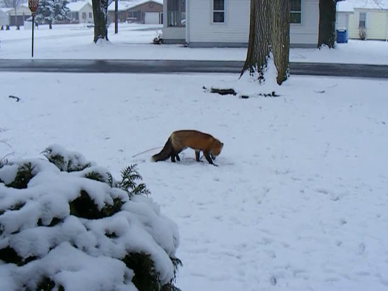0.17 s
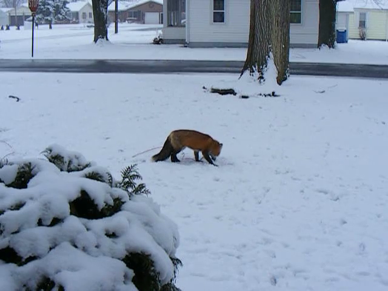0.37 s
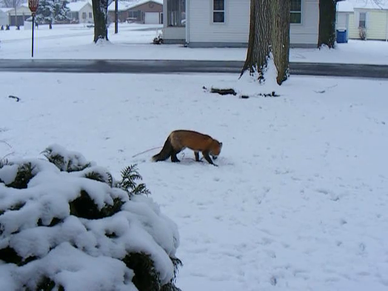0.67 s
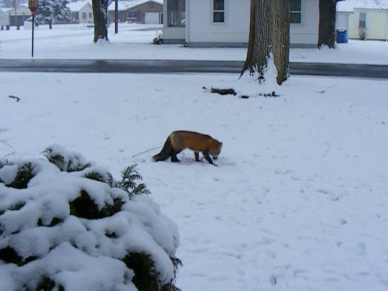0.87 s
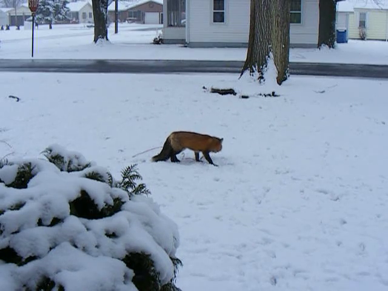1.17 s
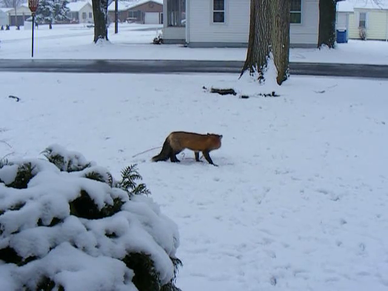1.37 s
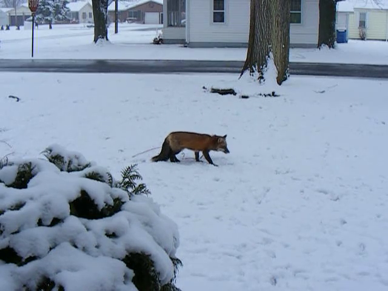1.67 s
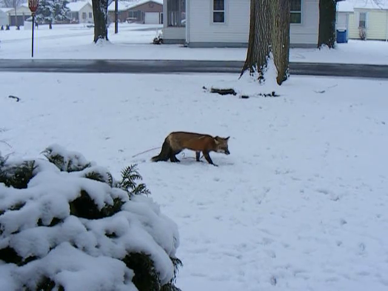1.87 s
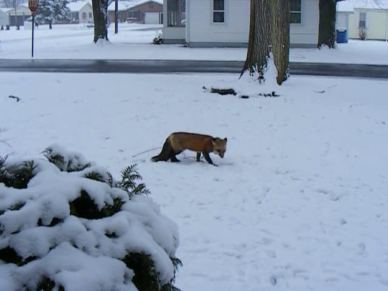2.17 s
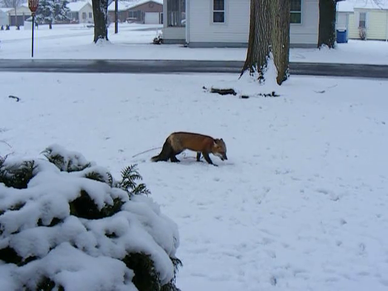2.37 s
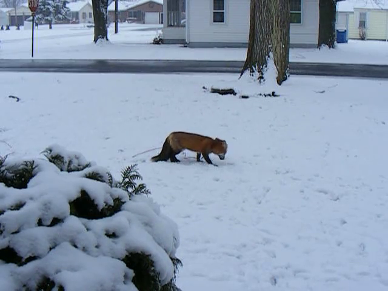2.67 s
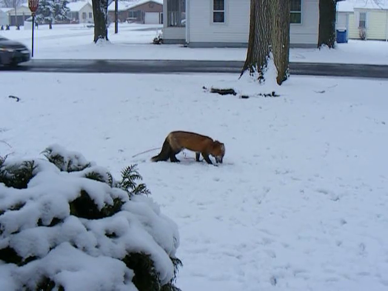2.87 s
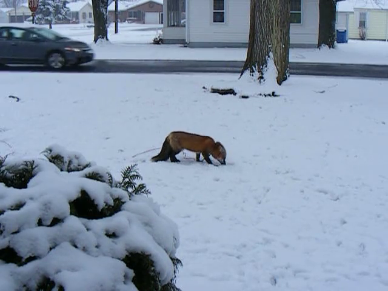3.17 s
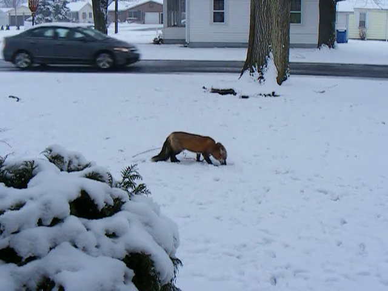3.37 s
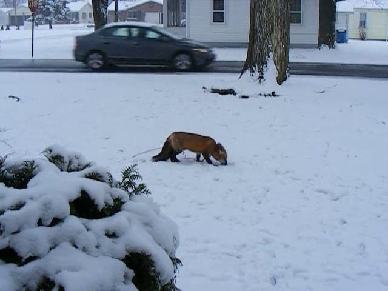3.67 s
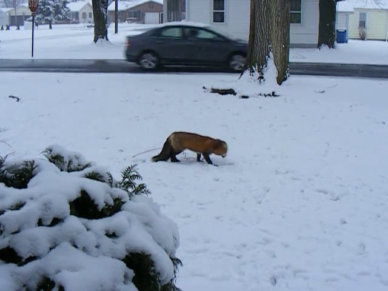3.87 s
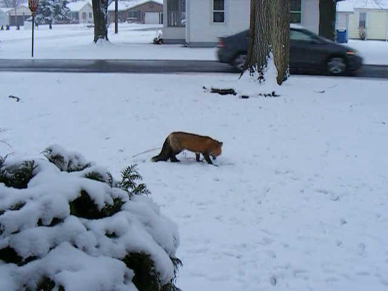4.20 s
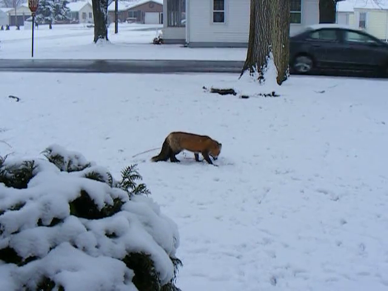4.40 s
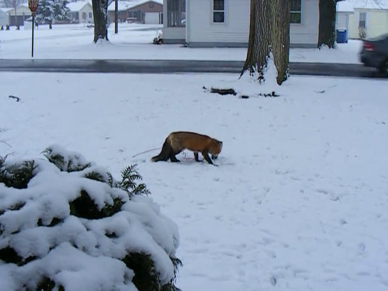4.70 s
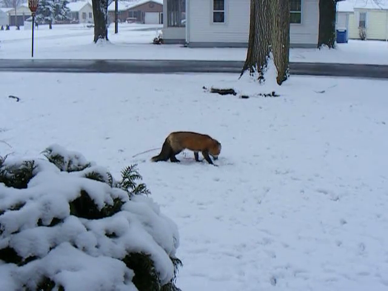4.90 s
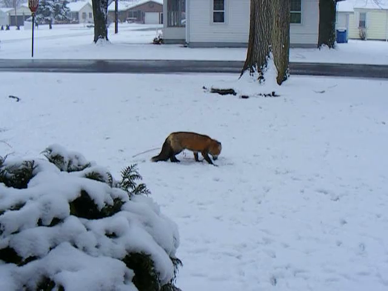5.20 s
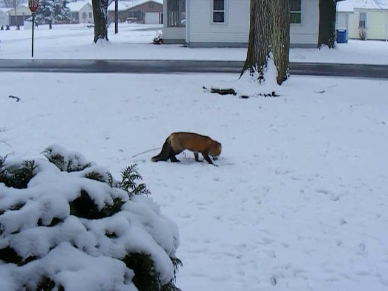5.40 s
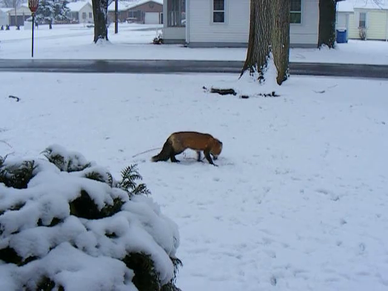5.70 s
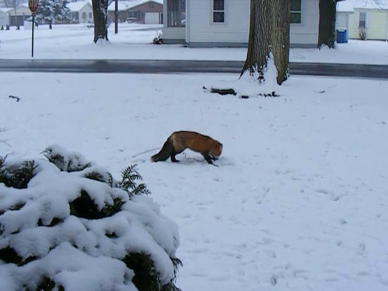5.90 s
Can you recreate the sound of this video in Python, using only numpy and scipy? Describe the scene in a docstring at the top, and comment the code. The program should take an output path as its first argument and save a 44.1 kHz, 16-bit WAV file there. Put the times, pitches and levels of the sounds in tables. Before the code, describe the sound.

Low engine hum and lumpy slush crackling early on, settling into wet-road tyre hiss, a burst of spray and a growing low road roar.

```python
"""A car pulls away through slush, changes gear and rolls past on a wet street, heard across a snowy garden.
First the engine hums over a lower idling hum; then slush crunches as clicks and noise bursts in resonances.
The engine pitch climbs, then falls at the gear change. Noise and droplets in resonances make the tar hiss.
Spray splashes up as the car comes nearer, the tread roar grows, and low gusts come near the end."""
import sys
import numpy as np
from scipy import signal
from scipy.fft import rfft, irfft, next_fast_len
from scipy.io import wavfile

SR = 44100
rng = np.random.default_rng(int(sys.argv[2]) if len(sys.argv) > 2 else 0)


def convert_level_to_amplitude(level_db):
    """Map a level in decibels to its linear amplitude factor."""
    exponent = np.asarray(level_db, float) / 20
    return 10 ** exponent


def digitize_waveform(pressure):
    """Quantize a signal to 16-bit integers and store it at the path in sys.argv[1].

    Rows of a 2-D input are taken as channels; values are limited to [-1, 1].
    """
    field = np.atleast_2d(pressure).T
    bounded = np.clip(field, -1, 1)
    quanta = np.round(bounded * 32767).astype(np.int16)
    wavfile.write(sys.argv[1], SR, quanta)


N = 266760

# Tyres crushing slush. Each row: time in seconds, level in dB before the high-pass.
SLUSH_LEVELS = [(0.362, -34), (0.43, -28.5), (0.57, -31.5), (0.75, -28.5), (0.87, -27.5), (0.91, -30),
                (0.95, -22), (1.3, -18.5), (1.38, -23.5), (1.44, -19.5), (1.5, -22.5), (1.61, -18.5),
                (1.77, -23), (1.92, -22), (1.95, -18.5), (2.0, -23.5), (2.35, -34)]


def rms_one(x):
    """Scales to rms 1."""
    return x / np.sqrt(np.mean(x ** 2) + 1e-20)


def in_time(rows):
    """Columns of a table against time, straight lines between rows."""
    s, *columns = np.transpose(rows)
    t = np.arange(N) / SR
    return [np.interp(t, s, column) for column in columns]


def while_heard(rows, fade_s):
    """Gain 1 between the first and last row, fading linearly outside."""
    t = np.arange(N) / SR
    inside_s = np.minimum(t - rows[0][0], rows[-1][0] - t)
    return np.clip(1 + inside_s / fade_s, 0, 1)


def swells(rows):
    """Sum of bell-shaped gains; rows: top in seconds, half-width in seconds at 1/e, level in dB."""
    t = np.arange(N) / SR
    return sum(convert_level_to_amplitude(db) * np.exp(-((t - top_s) / half_s) ** 2) for top_s, half_s, db in rows)


def drift(rate_hz):
    """Slow chance with spread 1: noise at every 40th sample through a double one-pole low-pass."""
    r = np.exp(-2 * np.pi * rate_hz * 40 / SR)
    noise = rng.standard_normal(N // 40 + 2002)
    slow = signal.lfilter([1], [1, -2 * r, r * r], noise)[2000:]   # drop the settling
    return np.interp(np.arange(N) / 40, np.arange(len(slow)), rms_one(slow))


def resonance(x, hz, width_hz):
    """Two-pole band-pass, gain 1 on top."""
    r = np.exp(-np.pi * width_hz / SR)
    zeros = np.array([1, 0, -1]) * (1 - r * r) / 2
    poles = [1, -2 * r * np.cos(2 * np.pi * hz / SR), r * r]
    return signal.lfilter(zeros, poles, x)


def rushing(modes, grains_per_s, grain_db, shared_db, own_db, flicker_hz):
    """Noise plus uneven droplets in resonances flickering together and alone; rms 1 at the microphone."""
    sizes = convert_level_to_amplitude(grain_db * np.minimum(rng.exponential(1, N), 4)) * rng.choice([-1, 1], N)
    grains = rms_one(sizes * (rng.random(N) < grains_per_s / SR))
    together, out = drift(flicker_hz), 0
    for hz, width_hz, level_db in modes:
        source = 0.75 * grains + 0.64 * rng.standard_normal(N)
        pass_hz = 1.91 * width_hz
        rung = resonance(resonance(source, hz, pass_hz), hz, pass_hz)   # twice: steep skirts
        flicker_db = shared_db * together + own_db * drift(flicker_hz)
        out = out + convert_level_to_amplitude(level_db + flicker_db) * rung
    return out / np.std(microphone(out))


def hum(hz, levels_db, waver_db):
    """Sines on the multiples of a moving pitch, each wavering in strength; rms levels."""
    phase = 2 * np.pi * np.cumsum(hz) / SR
    out = 0
    for multiple, db in enumerate(levels_db, 1):
        level = np.sqrt(2) * convert_level_to_amplitude(db + waver_db * drift(9))
        out = out + level * np.sin(multiple * phase + rng.uniform(0, 2 * np.pi))
    return out


def small_lumps():
    """Lesser lumps burst at random through the slush, their peaks following its level."""
    count, above_slush_db, spread_db = 24, 13.0, 3.0
    low_hz, high_hz, snap = 1300, 2400, 0.5
    when, size, pitch = rng.random((count, 3)).T
    slush_s, slush_db = np.transpose(SLUSH_LEVELS)
    s = slush_s[0] + when * (slush_s[-1] - slush_s[0])
    peak_db = np.interp(s, slush_s, slush_db) + above_slush_db + spread_db * (2 * size - 1)
    hz = low_hz * (high_hz / low_hz) ** pitch
    return list(zip(s, peak_db, hz, [snap] * count))


def crunches():
    """Each lump is a click in a few milliseconds of dying noise, ringing around its own pitch."""
    # Loudest lumps. Each row: start in seconds, peak in dB before the high-pass, pitch in Hz, snap share 0-1.
    big_lumps = [(0.4333, -6, 2070, 0.55), (0.4617, -6, 2150, 0.4), (0.5, -8.5, 2110, 0.4),
                 (0.5934, -8, 1130, 0.7), (0.6538, -5, 2300, 0.7), (0.6876, -6, 2190, 0.6),
                 (0.7305, -6, 2130, 0.6), (0.8728, -1, 1500, 0.75), (0.9351, -7, 2330, 0.4),
                 (0.9506, -2, 2260, 0.3), (1.006, -5, 2140, 0.6), (1.0987, -3, 2310, .55),
                 (1.1357, 2, 1290, 0.8), (1.1626, 3, 2340, 0.65), (1.2564, 1, 1360, .7),
                 (1.267, 2, 2000, .7), (1.3063, 4.5, 2240, 0.8), (1.4006, 2, 2160, 0.35),
                 (1.445, -3, 1400, 0.4), (1.5407, 4, 1690, 0.8), (1.6015, -2, 2400, 0.2),
                 (1.6485, -3, 2150, 0.6), (1.6749, 2, 1590, 0.75), (1.6934, -3, 2290, 0.6),
                 (1.7513, 1, 2170, .8), (1.7767, -3, 1590, .75), (1.9304, -4, 1530, 0.3),
                 (1.9583, 2, 2200, 0.75), (2.089, -6, 1590, 0.55), (2.2287, -7, 1670, 0.7)]
    lumps = big_lumps + small_lumps()
    length = 1500
    t, out = np.arange(length) / SR, np.zeros(N + length)
    noises = rng.standard_normal((len(lumps), length))
    for (s, peak_db, hz, snap), noise in zip(lumps, noises):
        force = (1 - snap) * noise * np.exp(-t / 0.005)
        force[20] -= 6 * snap   # the click
        burst = resonance(force, hz, 1300) + 0.18 * resonance(force, 3500, 2000)
        out[round(s * SR):][:length] += convert_level_to_amplitude(peak_db) * burst / np.abs(burst).max()
    return out[:N]


def slush():
    """Coarse, lumpy crushing noise plus the bursting lumps, without bass."""
    # Slush resonances. Each row: centre in Hz, nominal width in Hz, level in dB.
    slush_modes = [(1096, 140, -14), (1308, 290, 1), (1800, 360, -1), (2147, 224, 3), (2876, 920, -5.5),
                   (3550, 610, -2)]
    crushing = rushing(slush_modes, 1200, 4.5, shared_db=0.9, own_db=1.3, flicker_hz=70)
    crushing *= convert_level_to_amplitude(in_time(SLUSH_LEVELS)[0]) * while_heard(SLUSH_LEVELS, 0.012)
    no_bass = signal.butter(4, 850, "high", fs=SR, output="sos")   # small lumps make no bass
    return signal.sosfilt(no_bass, crushing + crunches())


def wet_tar():
    """Hiss of wet tar, duller from afar; a subtracted resonance stands for the ground echo's dip."""
    # Tar hiss. Each row: time in seconds, level in dB before tilt and dip, treble in dB against the rest,
    # share cancelled by the ground echo 0-1.
    hiss_levels = [(0.0, -28, -10, 0.1), (0.4, -28, -5.5, 0), (0.6, -26.5, -2.5, 0.05),
                   (0.86, -26.5, -13, 0.05), (1.08, -27.5, -5.5, .05), (2.2, -26.5, 3, 0.9),
                   (2.5, -25.5, 1.5, 0.7), (2.95, -26.5, 1, 0.6), (3.7, -25, -0.5, 0.1),
                   (4.28, -30.5, 1, 0.05), (4.89, -26.5, -1, 0.1), (5.05, -30.5, -1, 0.3),
                   (5.7, -26.5, -2, .1), (6.05, -27, -0.5, 0.2)]
    # Hiss resonances. Each row: centre in Hz, nominal width in Hz, level in dB.
    hiss_modes = [(1270, 370, -1.5), (1972, 423, 0.5), (2567, 910, -1.5), (3376, 510, -6)]
    treble_from_hz, dip_hz, dip_width_hz = 1600, 2020, 500
    level_db, treble_db, cancelled = in_time(hiss_levels)
    hiss = rushing(hiss_modes, 5000, 3.7, shared_db=0.5, own_db=0.96, flicker_hz=15)
    low = signal.sosfilt(signal.butter(1, treble_from_hz, fs=SR, output="sos"), hiss)
    hiss = low + convert_level_to_amplitude(treble_db) * (hiss - low)
    hiss = hiss - cancelled * resonance(hiss, dip_hz, dip_width_hz)
    return convert_level_to_amplitude(level_db) * hiss


def tread_roar():
    """Tread roar: almost smooth noise in a narrow group of resonances."""
    # Tread roar. Each row: time in seconds, level in dB.
    roar_levels = [(0.0, -40), (0.86, -36.5), (1.28, -33), (2.33, -36.5), (3.15, -34.5), (3.99, -36),
                   (4.28, -29.5), (4.6, -27), (4.9, -28.5), (5.37, -25), (5.76, -26.5), (5.9, -29.5),
                   (6.05, -29.5)]
    # Tread resonances. Each row: centre in Hz, nominal width in Hz, level in dB.
    roar_modes = [(826, 174, 2.5), (924, 118, 6.5), (1040, 220, -2)]
    roar = rushing(roar_modes, 2500, 2.7, shared_db=1.4, own_db=0.5, flicker_hz=8.3)
    return convert_level_to_amplitude(in_time(roar_levels)[0]) * roar


def groove_whistle():
    """Air pumped in the tread grooves: noise in one resonance."""
    # Groove whistle. Each row: time in seconds, level in dB.
    groove_levels = [(0.0, -42), (0.6, -34.5), (1.08, -32.5), (1.84, -28.5), (2.33, -34.5), (2.7, -31),
                     (3.15, -31.5), (3.8, -31), (4.5, -36), (4.89, -35), (5.37, -28.5), (5.7, -32),
                     (5.9, -42), (6.05, -44)]
    # Groove resonance. Each row: centre in Hz, nominal width in Hz, level in dB.
    groove_modes = [(1511, 213, 0)]
    whistle = rushing(groove_modes, 3000, 2.3, shared_db=-0.5, own_db=1.5, flicker_hz=11)
    return convert_level_to_amplitude(in_time(groove_levels)[0]) * whistle


def early_groove():
    """The groove whistle's lower pitch at the start: noise in one resonance."""
    # Early whistle. Each row: time in seconds, level in dB.
    early_levels = [(0.0, -37), (0.4, -35), (0.8, -38)]
    # Its resonance. Each row: centre in Hz, nominal width in Hz, level in dB.
    early_modes = [(1244, 200, 0)]
    whistle = rushing(early_modes, 3000, 2.0, shared_db=1.5, own_db=1.0, flicker_hz=10)
    return convert_level_to_amplitude(in_time(early_levels)[0]) * while_heard(early_levels, 0.2) * whistle


def spray():
    """Water thrown up in a second splash: fine droplets in resonances."""
    # Spray. Each row: time in seconds, level in dB.
    spray_levels = [(4.15, -33.5), (4.39, -21), (4.56, -24.5), (4.66, -20.5), (4.82, -26), (5.04, -26.5),
                    (5.08, -33.5), (5.17, -31), (5.25, -30), (5.36, -27), (5.45, -33)]
    # Spray resonances. Each row: centre in Hz, nominal width in Hz, level in dB.
    spray_modes = [(1980, 490, 3), (2470, 400, -1), (3050, 500, -2.5)]
    water = rushing(spray_modes, 3000, 4.1, shared_db=0.8, own_db=1.2, flicker_hz=30)
    return convert_level_to_amplitude(in_time(spray_levels)[0]) * while_heard(spray_levels, 0.26) * water


def low_road_noise():
    """Body, panel and rumble resonances, each gaining its own share as the car draws nearer."""
    # The car draws nearer. Each row: time in seconds, gain in dB.
    nearness = [(0.0, 0), (0.9, 3), (1.6, 4), (2.3, 4), (3.2, 5.5), (3.9, 8), (4.3, 7), (5.0, 8.5),
                (5.4, 10), (6.05, 10.5)]
    # Body resonances. Each row: centre in Hz, nominal width in Hz, level in dB.
    body_modes = [(490, 120, 1.5), (630, 127, 5)]
    # Panel resonances, columns as for the body.
    panel_modes = [(268, 44, -5), (316.8, 40, 4), (412, 101, 3.5)]
    # Rumble resonances, columns as for the body.
    rumble_modes = [(35.2, 66, -9.5), (103, 64, -2), (173, 82, -3.5)]
    near_db, = in_time(nearness)
    body = rushing(body_modes, 2500, 2.3, shared_db=1.0, own_db=-0.75, flicker_hz=5.6)
    panel = rushing(panel_modes, 2500, 1.5, shared_db=0.05, own_db=0.8, flicker_hz=12)
    rumble = rushing(rumble_modes, 2500, 1.6, shared_db=0.3, own_db=0.3, flicker_hz=13)
    out = convert_level_to_amplitude(-48 + 1.77 * near_db) * body
    out += convert_level_to_amplitude(-40 + 0.41 * near_db) * panel
    return out + convert_level_to_amplitude(-43.5 + near_db) * rumble


def gusts():
    """Low gusts near the end: noise in two resonances under bell-shaped gains."""
    # Gusts. Each row: top in seconds, half-width in seconds, level in dB.
    gust_swells = [(5.55, 0.048, -35.5), (5.64, 0.11, -34), (5.78, 0.11, -39)]
    # Gust resonances. Each row: centre in Hz, nominal width in Hz, level in dB.
    gust_modes = [(233, 45, -4), (303, 61, -0.5)]
    gust = rushing(gust_modes, 2500, 1.5, shared_db=2.5, own_db=-1.3, flicker_hz=15)
    return swells(gust_swells) * gust


def engine():
    """Wavering firing tone with its second and third multiples as the exhaust pipe passes them."""
    # Engine. Each row: time in seconds, firing rate in Hz, firing tone in dB, upper multiples in dB before the pipe.
    engine_course = [(0.0, 65.37, -44.5, -44), (0.34, 68.6, -40.5, -44.5), (0.5, 70.27, -40, -41.5),
                     (1.13, 76.2, -40, -36), (1.4, 77.04, -37, -36), (1.55, 72.28, -42.5, -35),
                     (1.73, 65.29, -39.5, -45.5), (1.87, 61.5, -41.5, -39), (2.46, 62.34, -38.5, -37.5),
                     (2.98, 63.54, -39, -34), (3.54, 64.7, -36, -49), (3.77, 63.6, -37, -37.5),
                     (4.09, 62.25, -39.5, -35.5), (4.28, 63.76, -50, -49), (4.5, 63, -43, -52),
                     (4.92, 63.8, -40, -43.5), (5.2, 53.23, -38.5, -39.5), (5.49, 49.5, -46, -41.5),
                     (6.05, 49.2, -39.5, -46.5)]
    # Exhaust pipe's effect on the upper multiples. Each row: frequency in Hz, gain in dB.
    pipe_gains = [(95, 4), (115, 0), (127, -10), (138, 2.5), (155, -9), (175, -3.5), (189, 1), (200, -2.5),
                  (232, -15)]
    firing_hz, tone_db, upper_db = in_time(engine_course)
    pipe_hz, pipe_db = np.transpose(pipe_gains)
    levels_db = [tone_db]
    for multiple in (2, 3):
        passed_db = np.interp(multiple * firing_hz, pipe_hz, pipe_db)
        levels_db.append(upper_db + passed_db + 0.86 * drift(7.5))
    return hum(firing_hz, levels_db, waver_db=1.76)


def drone():
    """A rough drone: one sine, wandering in pitch and strength, comes and goes in swells."""
    # Drone. Each row: top in seconds, half-width in seconds, level in dB.
    drone_swells = [(2.53, 0.092, -38), (3.5, 0.083, -38.5), (3.72, 0.089, -40), (4.6, .2, -37.5),
                    (4.88, 0.041, -41.5), (5.06, 0.22, -44.5), (5.65, .08, -30.5), (5.8, 0.1, -36)]
    pitch_hz = 224.3 + 2.7 * drift(5.1)
    return swells(drone_swells) * hum(pitch_hz, [0], waver_db=3.0)


def idling():
    """A lower hum beating against the engine: one wavering sine."""
    # Idling hum. Each row: time in seconds, pitch in Hz, level in dB.
    idling_course = [(0.0, 60.7, -46), (0.25, 59.3, -44), (0.7, 57.6, -43), (1.3, 53.7, -51)]
    hz, level_db = in_time(idling_course)
    return while_heard(idling_course, 0.15) * hum(hz, [level_db], waver_db=-3.5)


def mist():
    """Fine droplets hanging round the wheels: a high, quickly flickering hiss."""
    # Mist. Each row: time in seconds, level in dB.
    mist_levels = [(0.0, -51.5), (0.45, -49), (0.925, -51.5), (0.945, -33.5), (0.98, -47), (1.04, -41),
                   (1.47, -44.5), (1.6, -39), (1.8, -43), (1.9, -48.5), (2.2, -51.5), (2.9, -50),
                   (3.72, -46.5), (4.14, -50.5), (4.43, -44.5), (5.1, -51.5), (6.05, -51)]
    # Mist resonances. Each row: centre in Hz, nominal width in Hz, level in dB.
    mist_modes = [(4500, 500, -3), (5000, 840, -2.5), (6200, 1100, 0.5)]
    droplets = rushing(mist_modes, 3000, 3.3, shared_db=1.8, own_db=1.0, flicker_hz=30)
    return convert_level_to_amplitude(in_time(mist_levels)[0]) * droplets


def sheen():
    """A high, narrow band of hiss that comes in for about a second and stops sharply."""
    # Sheen. Each row: time in seconds, level in dB.
    sheen_levels = [(3.0, -50.5), (3.3, -55.5), (3.7, -51), (4.1, -49), (4.3, -64)]
    # Sheen resonances. Each row: centre in Hz, nominal width in Hz, level in dB.
    sheen_modes = [(4460, 350, 5.5), (4900, 280, 1)]
    band = rushing(sheen_modes, 2200, 2.5, shared_db=2.4, own_db=0.3, flicker_hz=15)
    return convert_level_to_amplitude(in_time(sheen_levels)[0]) * while_heard(sheen_levels, 0.06) * band


def scene():
    """Sum of tyre, road and engine sounds, one channel."""
    tyres = slush() + tread_roar() + groove_whistle() + early_groove() + spray() + mist()
    road = wet_tar() + low_road_noise() + gusts() + sheen()
    motor = engine() + drone() + idling()
    return (tyres + road + motor)[None]


def microphone(x):
    """Colour of a small microphone, falling away fast in the treble."""
    # Microphone response. Each row: frequency in Hz, gain in dB.
    response = [(20, -13.5), (45, 3), (80, -2), (3000, -3), (3800, -13.5), (4600, -20), (5600, -29.5),
                (6400, -39.5), (7000, -51), (7300, -63), (7600, -90)]
    size = next_fast_len(N + 4096)
    hz, db = np.transpose(response)
    bins_hz = np.arange(size // 2 + 1) * SR / size
    colour = convert_level_to_amplitude(np.interp(np.log(bins_hz + 1), np.log(hz), db))
    return irfft(rfft(x, size) * colour, size)[..., :N]


def band_limit(x):
    """A steep low-pass at the top of the band."""
    return signal.sosfilt(signal.butter(12, 7190, fs=SR, output="sos"), x)


def record(dry):
    """Microphone colour, a trace of converter noise and a constant offset."""
    converter_noise = convert_level_to_amplitude(-91) * rng.standard_normal(dry.shape)
    offset = -0.0031
    return band_limit(microphone(dry) + converter_noise + offset)


dry = scene()
out = record(dry)
digitize_waveform(out)
```